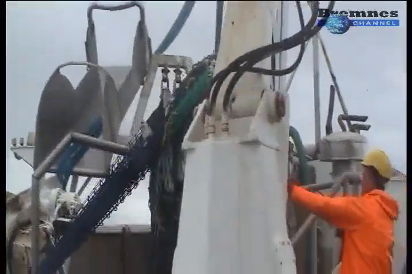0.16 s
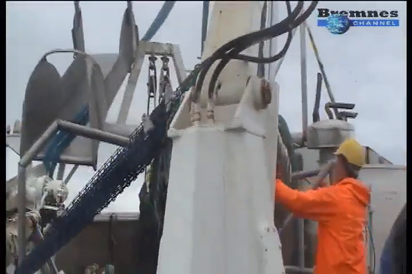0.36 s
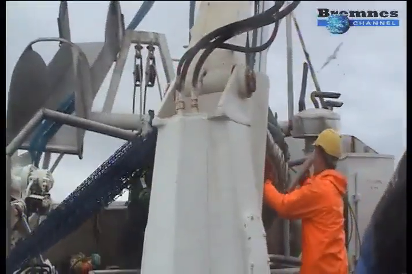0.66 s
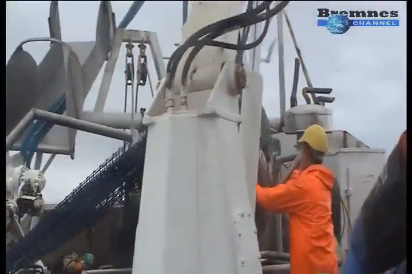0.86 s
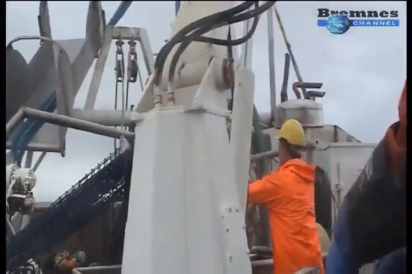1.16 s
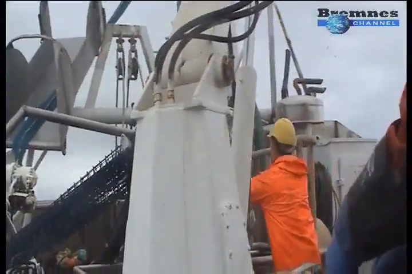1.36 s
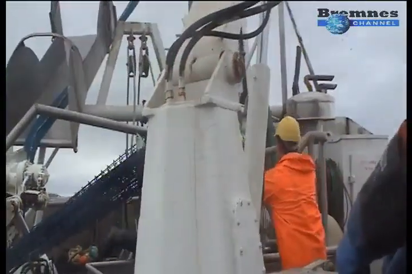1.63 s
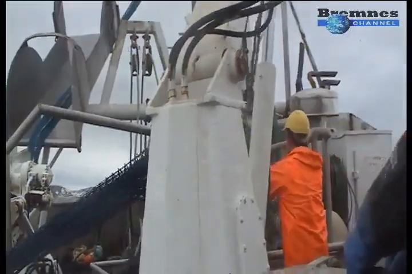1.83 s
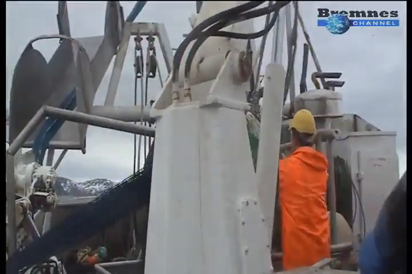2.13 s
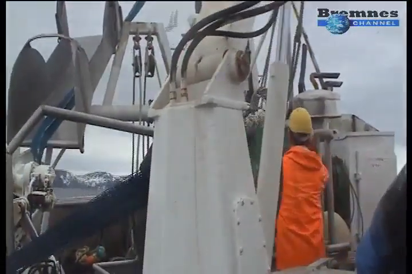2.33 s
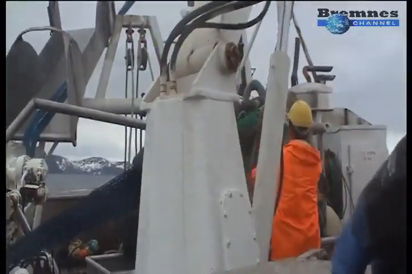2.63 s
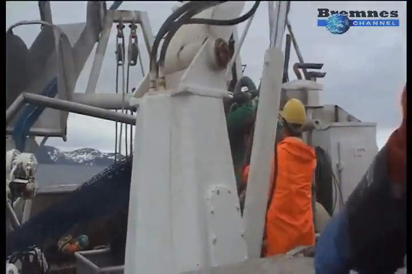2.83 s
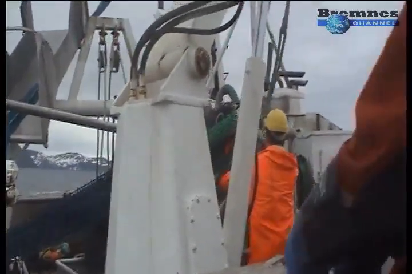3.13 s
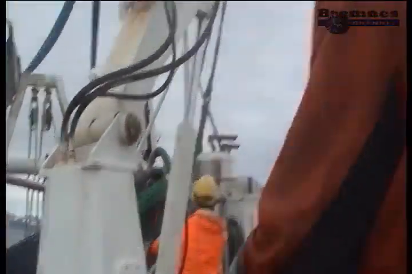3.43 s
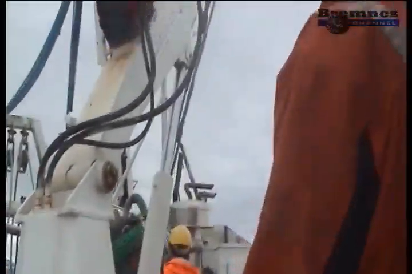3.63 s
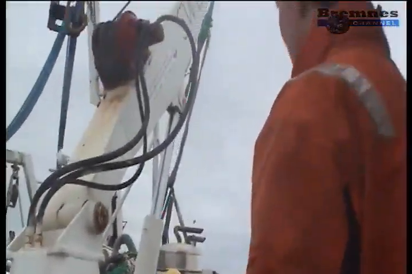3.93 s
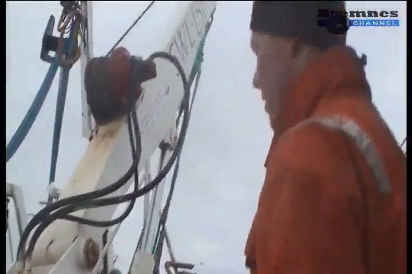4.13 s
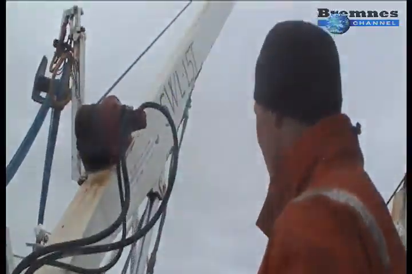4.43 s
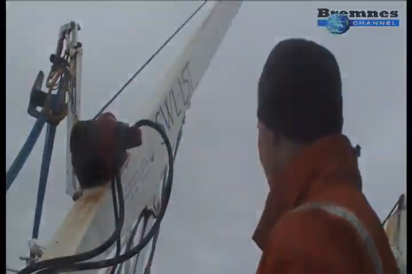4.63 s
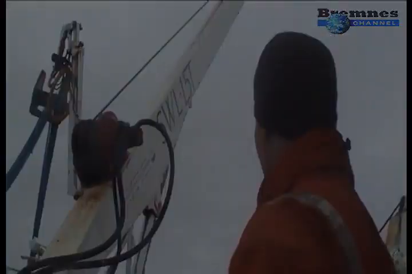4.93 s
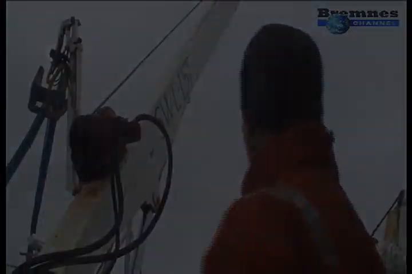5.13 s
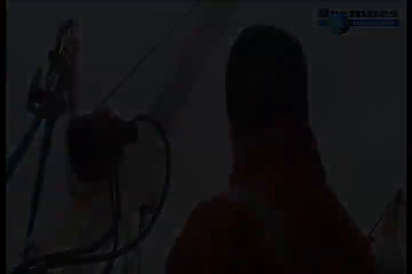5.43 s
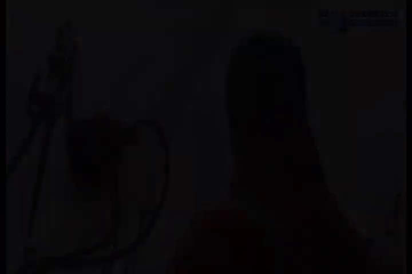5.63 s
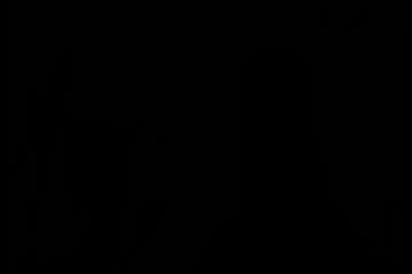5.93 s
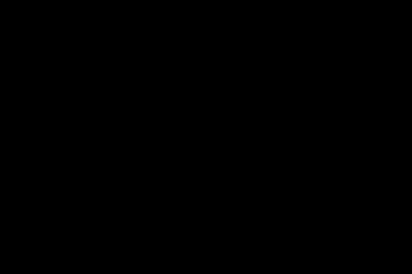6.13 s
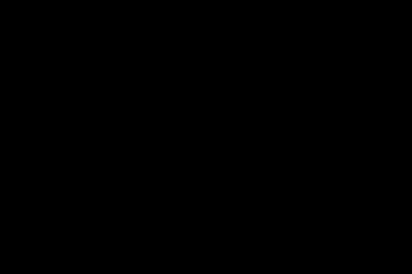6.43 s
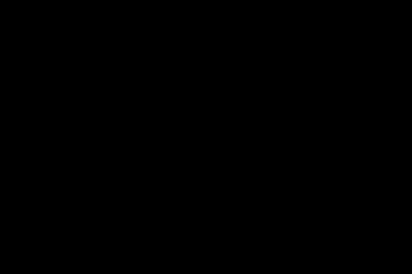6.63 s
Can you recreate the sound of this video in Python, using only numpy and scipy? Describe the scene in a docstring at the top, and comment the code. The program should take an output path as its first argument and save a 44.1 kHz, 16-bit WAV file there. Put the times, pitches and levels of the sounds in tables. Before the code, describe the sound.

On a boat deck, pressurised oil hisses with thin whistles above droning machinery, stutters through a chattering valve, rushes back steadily, and fades out.

```python
"""On the deck of a fishing boat, a hydraulic crane swings and hoists a net, heard by a two-port microphone.
Oil hisses through the control valves (banded noise), whistles at their edges (narrow noise lines) and rings the
pipes (resonators); the valve chatters shut, then the hoist valve opens. The pump hums on multiples of its
pulsation and labours, the steel groans (a falling tone), and generator hum, hull rumble and engine roar lie
under it. The whole scene fades out at the end.
"""
import sys
import numpy as np
from scipy import signal
from scipy.fft import rfft, irfft, next_fast_len
from scipy.io import wavfile

SR = 44100
rng = np.random.default_rng(int(sys.argv[2]) if len(sys.argv) > 2 else 0)


def wav_record(signal):
    """Record a signal, one row per channel, as 16-bit PCM in the file named by sys.argv[1]."""
    frames = np.transpose(np.atleast_2d(signal))
    bounded = np.clip(frames, -1, 1)
    # unit amplitude maps onto the largest positive 16-bit level
    quanta = np.round(bounded * 32767).astype(np.int16)
    wavfile.write(sys.argv[1], SR, quanta)


N = 298716

# Four levels given to by_circuit stand for slewing, moving the boom, relieving, hoisting.
# Pressure against the closing valve: start_s, load (0-1)
LOAD = [(0, 0.06), (2.12, 0), (2.23, 0.73), (2.34, 0.63), (2.42, 0.84), (2.55, 0.98), (2.83, 0.95),
        (2.88, 0.2), (2.97, 1), (3.07, 0.15), (6.77, 0)]
# Fade of the scene, with separate level changes for the low lines and the rumble:
# start_s, level_db, low_lines_db, rumble_db
FADE = [(0, 0.5, -1.5, -2), (4.3, -1, 1.5, 2), (5.1, -3, 2, 3), (5.45, -2.5, -2, -1),
        (5.6, -4.5, -5.5, -2.5), (6.08, -7.5, -6, 3.5), (6.17, -8.5, -19, 0.5), (6.77, -14.5, -11, -2.5)]
# Pump and rumble drop as the slew stops: start_s, change_db
PAUSE = [(1.04, -4.5)]
PAUSE_S = 0.04   # time to the lowest point
PUMP_SETTLES_S = 0.06   # pump and hull follow a valve change more slowly than the oil
GROAN_S, GROAN_LASTS_S = 2.2, 0.17   # the steelwork groans as the boom stops


def valves():
    """Oil jets hiss, whistle at the valve edges and ring the pipes; flow and the bouncing spool swell them."""
    # Oil flow through the open valve: start_s, flow_db
    flow_table = [(0, 1), (.6, -1), (1.42, -1), (1.47, -3.5), (1.53, -0.5), (1.58, -1), (2.04, -2),
                  (2.09, -6.5), (2.17, -6), (2.195, -10), (2.26, -7), (2.345, -8), (2.41, -10.5),
                  (2.46, -2.5), (2.67, -3), (2.785, -2.5), (2.83, 1.5), (2.895, 1), (2.92, -2),
                  (2.955, -12), (2.99, -5), (3.04, 0.5), (3.22, -0.5), (3.6, 0), (4.05, -0.5), (4.6, -1),
                  (5.15, -1.5), (5.33, -3), (5.4, -4.5), (5.47, -2), (6.1, -2.5), (6.77, -1.5)]
    # Spool bouncing on its seat: start_s, strength_db (before the fall sets in)
    chatter = [(2.028, 5), (2.052, 3.5), (2.112, 5), (2.146, 9.5), (2.165, -1), (2.203, 11), (2.255, 8.5),
               (2.302, 7.5), (2.324, 2), (2.361, 11.5), (2.382, 6.5), (2.422, 8.5)]
    # Colour of the jet: frequency_hz, density_db (per Hz, relative)
    hiss_spectrum = [(1500, -61), (2600, -13), (3100, -8), (3400, -8), (3650, -8.5), (4100, -6), (4540, -8),
                     (4900, -4), (5600, -7.5), (6300, -7), (7000, -7), (7600, -9.5), (10000, -14.5),
                     (11600, -18), (12800, -23.5), (14000, -31), (15500, -27)]
    bounce_rise_s, bounce_fall_s = 0.0045, 0.01479   # opens sharply, shuts more slowly (to 1/e)
    surge_s, surge_ends_s, surge_bright_db = 2.8, 2.9, 8.5   # first rush through the hoist valve

    flow_db, = in_time(flow_table)
    hiss_db = by_circuit((-32, -32.5, -33, -35.5)) + 0.19 * flow_db
    ringing_db = by_circuit((-27.5, -30.5, -29, -35)) + 1.87 * flow_db
    # pipes and the top of the hiss come up as the slew gathers speed
    ringing_db = ringing_db - 11 * (1 - step(0, rise_s=0.53))

    puffs_db = 0
    for s, strength_db in chatter:
        fall = np.exp(-step(s, 0.87) * 0.87 / bounce_fall_s)
        puffs_db = puffs_db + strength_db * step(s, bounce_rise_s) * fall

    # each bounce brightens the hiss too
    bright_db = by_circuit((-3.5, -3.5, -3, -1)) + 0.64 * flow_db + 0.33 * puffs_db
    bright_db = bright_db - 1 * (1 - step(0, rise_s=0.99))
    bright_db = bright_db - 0.5 * step(surge_ends_s, rise_s=2.7)   # dulls very slightly over most of the hoist
    surge_db = surge_bright_db * (step(surge_s, 0.023) - step(surge_ends_s, 0.03))

    hiss = 0
    for height, band in bands(hiss_spectrum, patchy_db=1.28, echo_db=10.5, count=8):
        top_share = np.clip(6.0 * (height - .55), 0, 1)
        hiss = hiss + from_db(bright_db * min(height, .8) + surge_db * top_share) * band

    ringing = rms_one(pipes(flicker_db=1.2))
    steady = from_db(hiss_db) * hiss + from_db(ringing_db) * ringing + whistles(flow_db)
    return from_db(puffs_db) * steady


def pipes(flicker_db):
    """Turbulent oil rings each pipe resonance, as hard as the open circuit drives it."""
    # Resonances of the oil pipes: frequency_hz
    pipe_hz = [1630, 1770, 2060, 2150, 2400, 3840, 4100, 4350, 5290, 5580, 5850, 7140, 7600, 7920, 8380,
               8790, 9300, 9820, 10480, 11100, 11800, 12900]
    # How each rings: width_hz, slewing_db, boom_db, relieving_db, hoisting_db
    pipe_ring = [(125.8, -24, -2, -20, -2), (90, -20, -9, -10, -3.5), (117, -8, 0.5, -9, -2.5),
                 (97, -8, -33, -0.5, -0.5), (60, -5.5, -1.5, 1, -3), (55, -16, 5.5, -11, 3.5),
                 (130, 1.5, 6.5, -5, 3.5), (110, 3.5, 3.5, -5, 0), (100, -18, -18, -9.5, 0),
                 (120.05, -17, -17, 1, -4), (89.5, -11, -2, -3, -3), (219, -2, 2.5, -15, 3.5),
                 (90, -9, 3.5, -15, 1), (180, 4.5, 0, -22, -1), (180, 3, 1, -24, 0),
                 (130, -0.5, -3.5, -22, -2.5), (150, -1.5, -5, -23, -3.5), (220, -5, -7.5, -20, -12),
                 (150, -10, -7.5, -25, -11), (170, -16, -13, -17, -13.5), (150, -13, -12, -26, -27),
                 (150, -33, -31, -26, -28)]

    oil = reflected_noise(echo_s=0.013, every_s=.4, echo_db=-9)
    out = 0
    for hz, (width_hz, *levels_db) in zip(pipe_hz, pipe_ring):
        r = np.exp(-np.pi * width_hz * 1.6 / SR)   # two wider passes give about width_hz together
        b = np.array([1, 0, -1]) * (1 - r * r) / 2
        a = [1, -2 * r * np.cos(2 * np.pi * hz / SR), r * r]
        ringing = signal.sosfilt([[*b, *a]] * 2, oil)   # twice through keeps the gaps dark
        out = out + from_db(by_circuit(levels_db) + flicker_db * drift(10.0)) * ringing
    return out


def whistles(flow_db):
    """Four edge tones swell with the flow, the lowest in bursts within a breathy band; one brief low one joins."""
    # Low, middle, high and just under the middle:
    # width_hz, flow_share, slewing_db, boom_db, relieving_db, hoisting_db
    edge_tones = [(91, 0.4, -44, -45.5, -47, -45.5), (138, 1.6, -36.5, -41.5, -44, -36.5),
                  (157, 0.87, -32.5, -35.5, -55, -39.5), (110, 1.5, -60, -60, -60, -44)]
    # Drift of the two upper whistles, the middle gaining what the high loses:
    # start_s, middle_hz, high_hz, balance_db
    whistle_drift = [(0, 4710, 6860, -0.5), (.8, 4660, 6890, 1), (1.05, 4750, 6830, 2.5),
                     (2.05, 4750, 6800, 0.5), (2.85, 4670, 6820, 1.5), (3.3, 4700, 6790, -1),
                     (3.55, 4650, 6850, 0), (4.6, 4640, 6850, 2), (5.3, 4620, 6870, -0.5),
                     (5.4, 4600, 6960, -4), (5.46, 4610, 6920, -0.5), (5.62, 4640, 6880, 1),
                     (5.75, 4650, 6860, 0.5), (6.77, 4740, 6840, 1)]
    # Bursts of the low whistle: start_s, lift_db
    squeals = [(.45, 5), (1.04, 1), (1.47, 11), (2.01, 8), (2.81, 8), (2.99, 7), (3.05, 11.5), (3.25, 10.5),
               (3.31, 10), (3.45, 5)]
    squeal_hz, under_hz = 3350, 4490
    squeal_dies_s, squeal_loss_db = 3.56, 48   # it stops once the hoist runs steadily
    under_starts_s, under_fades_s = 3.1, 4.7   # joins soon after the hoist starts, then thins away

    middle_hz, high_hz, balance_db = in_time(whistle_drift)
    squeal_db = bumps_db(squeals, rise_s=0.017) - squeal_loss_db * step(squeal_dies_s, 0.055)
    under_db = -30 * (1 - step(under_starts_s, 0.069)) - 15 * step(under_fades_s, 2.7)
    own = [(squeal_hz, squeal_db), (middle_hz, balance_db), (high_hz, -balance_db), (under_hz, under_db)]

    breath_db = by_circuit((-54, -50, -43, -45.5)) + flow_db
    breath_db = breath_db - squeal_loss_db * step(squeal_dies_s, .3)
    breath = whistle(squeal_hz, breath_db, width_hz=600)
    # a brief low whistle near the middle of the hoist
    chirp = bumps_db([(4.6, 1)], rise_s=0.065) * whistle(2090, level_db=-47, width_hz=60)

    out = chirp + breath
    for (hz, own_db), (width_hz, flow_share, *levels_db) in zip(own, edge_tones):
        level_db = by_circuit(levels_db) + flow_share * flow_db + own_db
        flicker_db = 1 * drift(17.0)
        out = out + whistle(hz, level_db + flicker_db, width_hz)
    return out


def whistle(hz, level_db, width_hz):
    """Jet edge tone: a sine whose height and phase are slow noise, so the line is width_hz wide."""
    low = signal.butter(2, width_hz / 2, fs=SR, output="sos")
    cos_part, sin_part = signal.sosfilt(low, rng.standard_normal((2, 2, N)))
    phase = 2 * np.pi * np.cumsum(hz * np.ones(N)) / SR
    return from_db(level_db) * rms_one(cos_part * np.cos(phase) + sin_part * np.sin(phase))


def pump():
    """Piston pressure pulses shake the hoses at multiples of their rate, which drops while the pump labours."""
    # Pulsation of the pump, dragged down while it labours: start_s, rate_hz
    pump_speed = [(0, 58.83), (2.0, 58.86), (2.26, 58.6), (2.5, 58.0), (2.9, 58.0), (3.02, 59.12),
                  (6.77, 59.14)]
    # 2nd to 7th multiple of the pulsation:
    # slewing_db, boom_db, hoisting_db, full_load_lift_db, shudder_change_db, waver_db
    multiples = [(-42.5, -43, -55.5, 0.5, -2.5, 2), (-42.5, -42, -46.5, 2.5, -13, 2.5),
                 (-50, -50.5, -69, 4, 5, 1.6), (-38, -33, -35.5, -0.5, -0.5, 0.86),
                 (-44, -46, -52.5, 15.5, -3.5, 1.8), (-71, -57, -65, 10, 2, 2.5)]
    # Share of the low lines' own level change that each multiple takes
    low_share = (1.4, 1.12, .5, 0.18, 0.82, 0.32)

    load, = in_time(LOAD)
    rate_hz = in_time(pump_speed)[0] + 0.03 * drift(0.5)   # wanders slowly
    low_db = in_time(FADE)[1]
    pause_db = bumps_db(PAUSE, PAUSE_S)
    out = 0
    for k, (slew, boom, hoist, lift_db, shudder_db, waver_db) in enumerate(multiples, 2):
        level_db = by_circuit([slew, boom, boom, hoist], PUMP_SETTLES_S)
        level_db = level_db + lift_db * load + shudder_db * shudder()
        level_db = level_db + low_share[k - 2] * low_db + pause_db
        out = out + tone(k * rate_hz, level_db, waver_db, side=0.45, start=0.811 * k * k)
    return out


def groan():
    """Stressed steelwork: a short low tone whose pitch drops quickly, then levels off."""
    from_hz, to_hz = 130, 99
    hz = to_hz + (from_hz - to_hz) * (1 - step(GROAN_S, GROAN_LASTS_S)) ** 2
    return groan_swell() * tone(hz, level_db=-40, waver_db=-1.0, side=0.55)


def groan_swell():
    """Half a sine over the length of the groan."""
    return np.sin(np.pi * step(GROAN_S, GROAN_LASTS_S))


def shudder():
    """1 while the hull shudders under the chattering valve, else 0, with short ramps."""
    return step(2.17, .06) - step(2.42, .05)


def deck():
    """Background: generator hum as two sines, hull rumble and broad engine-room roar as banded noise."""
    # Colours of the hull rumble and the engine roar: frequency_hz, density_db (per Hz, relative)
    rumble_spectrum = [(15, -44), (25, -13), (65, -8.5), (107, -4), (194, -4.5), (285, -0.5), (362, -3.5),
                       (479, -11.5), (600, -24.5), (780, -42.5), (1320, -120)]
    roar_spectrum = [(240, -31), (400, -2), (508, -5), (934, -6), (1060, -4), (1410, -6), (1730, -2.5),
                     (1960, -6), (2180, -2.5), (2720, -10), (3300, -16), (4290, -53), (7260, -120)]
    # Jolts of the boom through the deck, heard in the roar: start_s, lift_db
    jolts = [(.04, 5), (1.17, 3), (2.0, 4.5), (2.148, 6.5), (2.205, 2), (2.3, 2.5), (2.362, 2)]

    _, low_db, rumble_change_db = in_time(FADE)
    hum_hz = 50.8 * np.ones(N)
    hum_db = by_circuit((-50, -49, -46, -52)) + low_db
    hum = tone(hum_hz, hum_db, waver_db=1.5, side=1.0)
    hum = hum + tone(2 * hum_hz, hum_db - 7.5, waver_db=-3.0, side=0.51)

    rumble_db = by_circuit((-40, -39.5, -39.5, -41.5), PUMP_SETTLES_S) + rumble_change_db
    rumble_db = rumble_db + bumps_db(PAUSE, PAUSE_S) + 5.5 * in_time(LOAD)[0]
    rumble_db = rumble_db + 2 * groan_swell() + 2.5 * shudder()
    # tilts: dB from the lowest band to the highest
    rumble_tilt_db = by_circuit((-5.5, -4, 5, 11)) - 0.59 * low_db
    rumble = 0
    for height, band in bands(rumble_spectrum, patchy_db=0.52, echo_db=-15.0, count=6):
        rumble = rumble + from_db(rumble_tilt_db * (height - 0.76)) * band

    roar_db = by_circuit((-39.5, -38.5, -38, -40.5)) + bumps_db(jolts, rise_s=0.016)
    roar_tilt_db = by_circuit((-6, -4, -8.5, -1))
    roar = 0
    for height, band in bands(roar_spectrum, patchy_db=1.0, echo_db=-4, count=7):
        roar = roar + from_db(roar_tilt_db * (height - 0.4462)) * band
    return hum + from_db(rumble_db) * rumble + from_db(roar_db) * roar


def tone(hz, level_db, waver_db, side, start=0):
    """A steady line whose height and phase waver a little; the side gets it a quarter turn on."""
    phase = start + 2 * np.pi * np.cumsum(hz) / SR + 0.28 * drift(2.6)
    turn = np.array([[0], [np.pi / 2]])
    height = np.sqrt(2) * from_db(level_db + waver_db * drift(2.75))
    return height * np.sin(phase + turn) * [[1], [side]]


def bands(spectrum, patchy_db, echo_db, count):
    """Mid and side noise cut into bands, each flickering partly with the others; also each band's height 0-1."""
    noise = rms_one(coloured(reflected_noise(echo_s=0.02, every_s=.45, echo_db=echo_db), spectrum))
    size = next_fast_len(N)
    full = rfft(noise, size)
    hz = np.arange(size // 2 + 1) * SR / size
    centres = np.geomspace(spectrum[0][0], spectrum[-1][0], count)
    together = drift(2.73)
    for k in range(count):
        share = np.interp(hz, centres, np.arange(count) == k)   # a triangle round its centre
        band = irfft(full * share, size)[:, :N]
        yield k / (count - 1), band * from_db(patchy_db * (0.65 * together + drift(20.0)))


def reflected_noise(echo_s, every_s, echo_db):
    """Two noises rippled by reflections among the steelwork; the ripple changes as things move on deck."""
    hop, size = int(every_s * SR), int(4 * echo_s * SR)
    out = np.zeros((2, N + 4 * hop + size))
    decay = np.exp(-np.arange(size) / (echo_s * SR))
    fade = np.sin(np.pi * np.arange(2 * hop) / (2 * hop))   # overlapping pieces keep their power
    for start in range(0, N + hop, hop):
        echoes = rng.standard_normal((1, size)) * decay * from_db(echo_db) / np.sqrt(echo_s * SR)
        echoes[0, 0] = 1   # the direct sound
        piece = signal.fftconvolve(rng.standard_normal((2, 2 * hop)), echoes, axes=1)[:, :2 * hop]
        out[:, start:start + 2 * hop] += rms_one(piece) * fade
    return out[:, hop:hop + N]


def coloured(x, spectrum):
    """Filter x by a curve of gain in dB over frequency."""
    size = next_fast_len(N)
    hz = np.maximum(np.arange(size // 2 + 1) * SR / size, 1)
    return irfft(rfft(x, size) * from_db(at_hz(spectrum, hz)), size)[..., :N]


def drift(rate_hz):
    """Slow chance of spread 1: noise at every 40th sample through a double one-pole low-pass."""
    r = np.exp(-80 * np.pi * rate_hz / SR)
    noise = rng.standard_normal(N // 40 + 2002)
    slow = signal.lfilter([1], [1, -2 * r, r * r], noise)[2000:]   # skips the settling
    return np.interp(np.arange(N) / 40, np.arange(len(slow)), rms_one(slow))


def by_circuit(values, switch_s=0.0055):
    """One value for each open circuit, changing over as the valves switch."""
    # Slew to boom, boom to relief, relief to hoist: start_s
    valve_change_s = [1.11, 2.24, 2.8]
    knots = [s + late for s in valve_change_s for late in (0, switch_s)]
    return np.interp(np.arange(N) / SR, knots, np.repeat(values, 2)[1:-1])


def bumps_db(events, rise_s):
    """Each event moves a level to its peak in rise_s and lets it sink back."""
    kicks, r = np.full(N, 1e-12), np.exp(-1 / (rise_s * SR))
    for s, lift_db in events:
        kicks[int(s * SR)] += lift_db
    return signal.lfilter([0, np.e * r / (rise_s * SR)], [1, -2 * r, r * r], kicks)


def step(s, rise_s):
    """From 0 to 1 in rise_s, starting at s."""
    return np.clip((np.arange(N) / SR - s) / rise_s, 0, 1)


def in_time(rows):
    """Each column of a table as a signal, in straight lines between its times."""
    s, *columns = np.transpose(rows)
    return [np.interp(np.arange(N) / SR, s, c) for c in columns]


def at_hz(points, hz):
    """Read a curve in dB, in straight lines over log frequency."""
    curve_hz, curve_db = np.transpose(points)
    return np.interp(np.log(hz), np.log(curve_hz), curve_db)


def from_db(db):
    """Amplitude factor of a level in dB."""
    return np.exp(np.asarray(db) * np.log(10) / 20)


def rms_one(x):
    """Scale x to an RMS of 1."""
    return x / np.sqrt(np.mean(x ** 2) + 1e-20)


def scene():
    """The sum of all sources, and the difference that the two microphone ports make of it."""
    # Unrelated part of the left-right difference: frequency_hz, gain_db
    spread = [(60, -6.5), (150, -8), (350, -13), (800, -12), (2200, -11.5), (3800, -15.5), (4800, -30),
              (5500, -21), (6300, -12.5), (7500, -21), (9200, -14.5), (10300, -26), (11500, -49),
              (12300, -55)]
    # The ports hear a source off to one side unequally: frequency_hz, share_in_phase, share_quarter_turn_on
    port_table = [(40, -0.13, -0.26), (120, -0.011, -0.15), (345, 0.204, 0.072), (1100, 0.071, 0.045),
                  (2300, 0.017, 0.014), (4100, 0.13, 0.12), (5600, -0.049, 0.045), (6600, -0.095, 0.16),
                  (7300, .1, 0.43), (8000, 0.23, 0.18), (9000, 0.187, 0.086), (10000, .03, 0.11),
                  (11500, 0, -0.009)]
    # The microphone turns towards the crane: start_s, share of the port difference
    off_axis = [(0, 0.98), (2.7, 1.), (3.2, 0.6), (6.77, 0.47)]

    mid, side = valves() + pump() + groan() + deck()
    size = next_fast_len(N)
    hz = np.arange(size // 2 + 1) * SR / size
    port_hz, in_phase, quarter = np.transpose(port_table)
    ports = np.interp(hz, port_hz, in_phase + 1j * quarter)
    port_difference = irfft(rfft(mid, size) * ports, size)[:N]
    side = coloured(side, spread) + in_time(off_axis)[0] * port_difference
    return np.array([mid + side, mid - side])


def record(dry):
    """The fade, then a steep cut of the top, 70 dB down from 16 kHz."""
    faded = from_db(in_time(FADE)[0]) * dry
    return signal.sosfilt(signal.cheby2(12, 70, 16000, fs=SR, output="sos"), faded)


dry = scene()
out = record(dry)
wav_record(out)
```